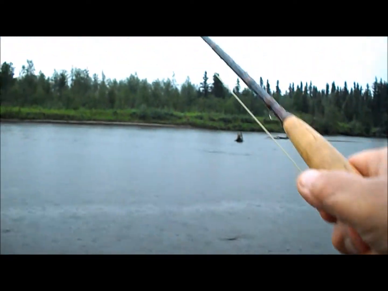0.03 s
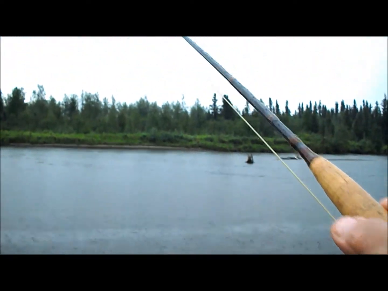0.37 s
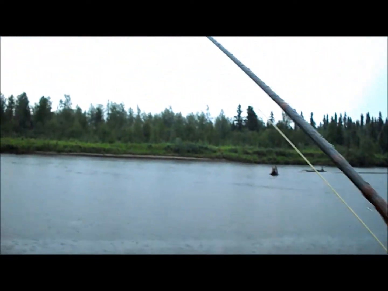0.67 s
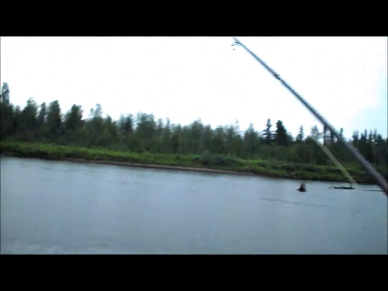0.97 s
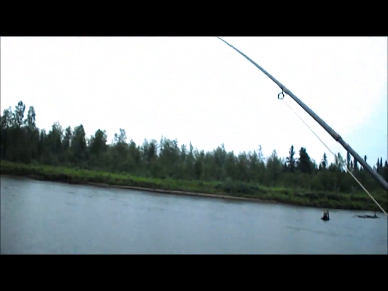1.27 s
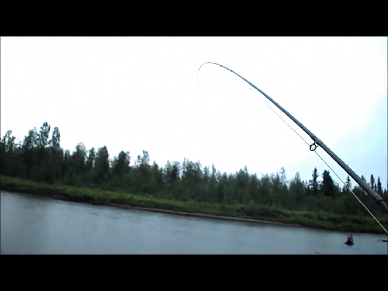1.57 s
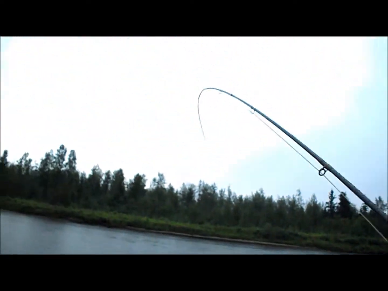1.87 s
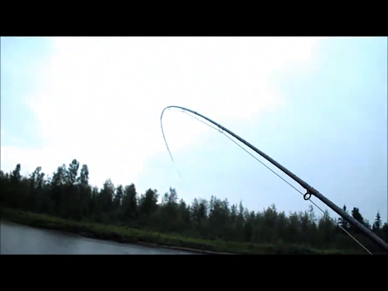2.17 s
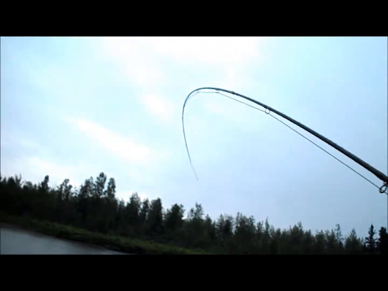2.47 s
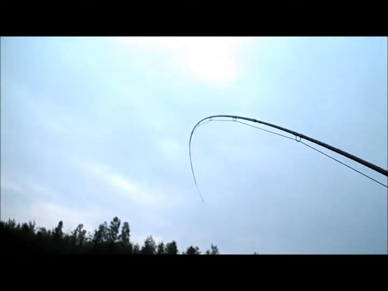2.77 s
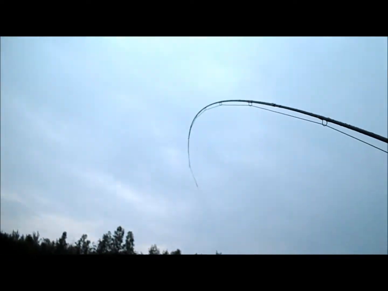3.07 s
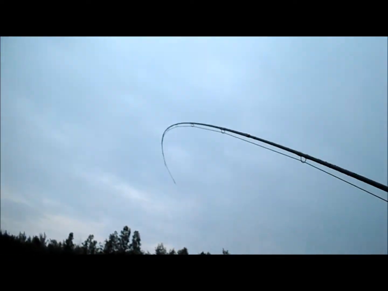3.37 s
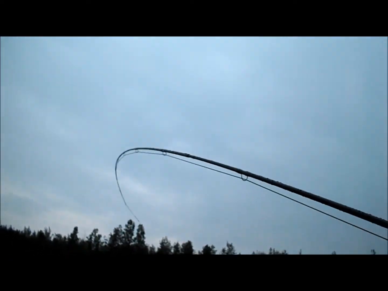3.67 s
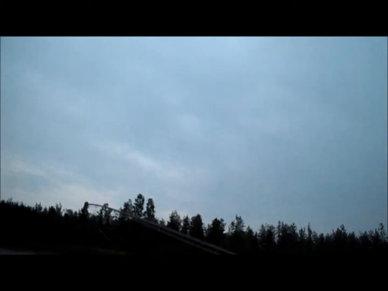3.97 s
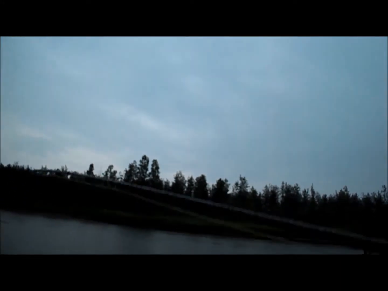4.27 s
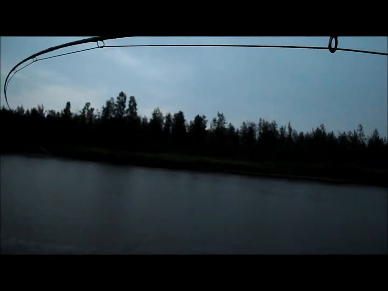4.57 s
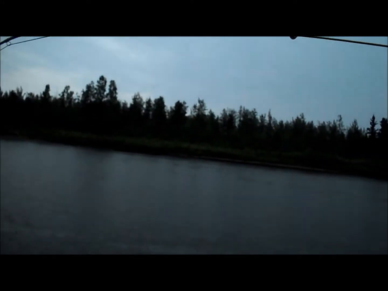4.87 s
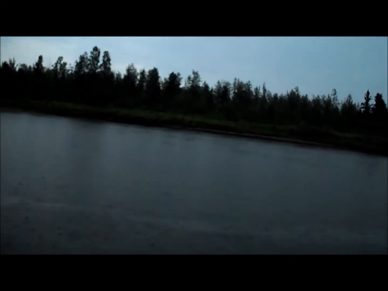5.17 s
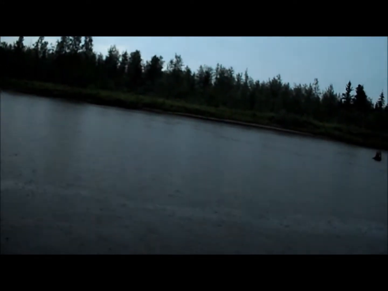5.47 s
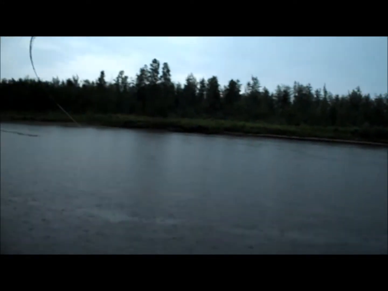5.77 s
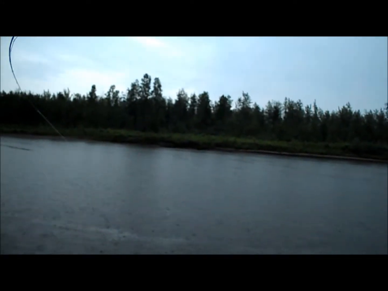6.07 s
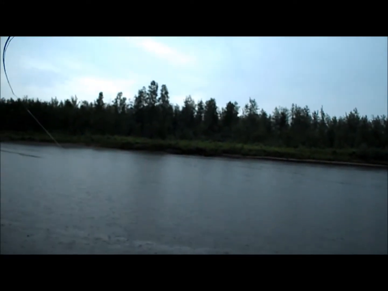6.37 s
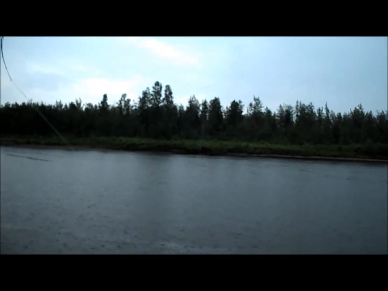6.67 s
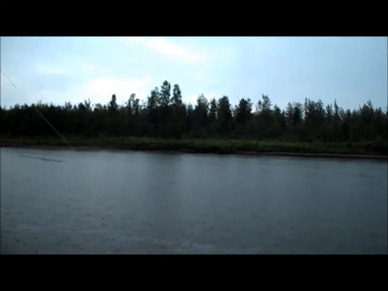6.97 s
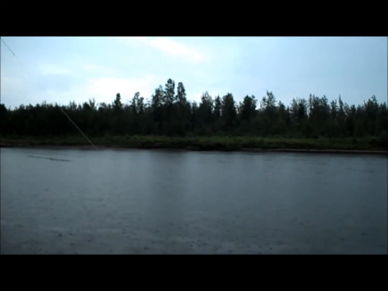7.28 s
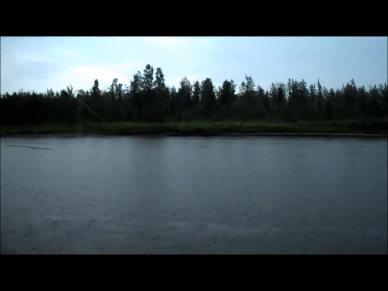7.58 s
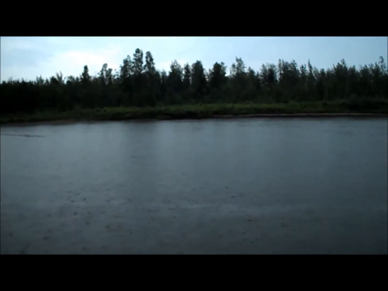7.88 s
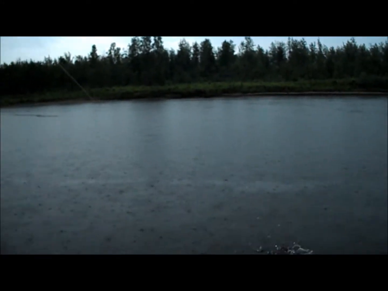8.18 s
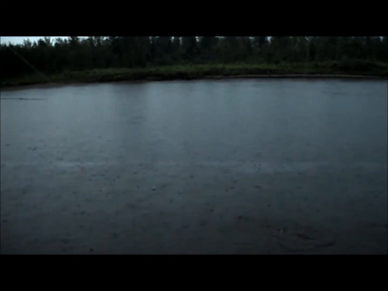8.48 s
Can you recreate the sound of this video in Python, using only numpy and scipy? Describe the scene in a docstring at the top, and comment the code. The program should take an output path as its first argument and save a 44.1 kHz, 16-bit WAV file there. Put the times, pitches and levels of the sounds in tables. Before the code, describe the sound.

Steady rain falls on a wide river for the whole eight and a half seconds, heard from the bank through a small handheld microphone. Distant drops merge into an even hiss, while nearer ones tick on the water and leave tiny, high bubble plinks. Now and then a drop strikes the microphone with a sharp click, clearly at about 2.1 seconds, hardest at 3.3 and again at 7.1. The hand makes a faint low rustle and soft, dull bumps between roughly 2.5 and 4.5 seconds, with firmer bumps at 6.2 and 7.7. A very faint, distant hum lies under the first few seconds. Around 6 seconds the water gives two slight sloshes. From 7.6 seconds to the end, a quick run of small, fizzy splashes stirs the shallows, with one loud, bright plink at 8.2, while the rain continues unchanged.

```python
"""Steady rain hisses on a wide river, heard through a small camera held by an angler on the bank.
Countless far drops merge into the hiss; nearer ones tick and now and then trap a ringing bubble,
and a few strike the camera itself. The hand rustles and softly bumps the case, and a faint drone
hums far away. Near the end something, probably a hooked fish, splashes in the shallows."""
import sys
import numpy as np
from scipy import signal
from scipy.fft import rfft, irfft, next_fast_len
from scipy.io import wavfile
from scipy.ndimage import uniform_filter1d, minimum_filter1d

SR = 44100
rng = np.random.default_rng(int(sys.argv[2]) if len(sys.argv) > 2 else 0)


def store_pcm(level_fs):
    """Save levels as 16-bit WAV."""
    pcm = np.round(np.clip(level_fs, -1, 1) * 32767).astype(np.int16)
    wavfile.write(sys.argv[1], SR, np.atleast_2d(pcm).T)


N = 376613


def undb(db):
    """Turn decibels into a number to multiply by."""
    return 10 ** (np.asarray(db) / 20)


def level(x, db):
    """Set the average (rms) level of a sound."""
    return x * undb(db) / np.sqrt(np.mean(x ** 2))


def band(x, lo_hz, hi_hz, order=2):
    """Keep the part of a sound between two frequencies."""
    return signal.sosfilt(signal.butter(order, [lo_hz, hi_hz], "band", fs=SR, output="sos"), x)


def wander(turns_per_s):
    """A smooth random drift, about 1 in size."""
    hold = int(SR / turns_per_s)
    steps = np.repeat(rng.standard_normal(N // hold + 1), hold)[:N]
    return level(uniform_filter1d(steps, hold), 0)


def place(start_s, sounds):
    """Add up short sounds (one a row), each at its own start time."""
    at = (start_s * SR).astype(int)[:, None] + np.arange(sounds.shape[1])
    return np.bincount(at.ravel(), sounds.ravel(), N)[:N]


def impacts(pitch_hz, width_hz, samples):
    """Quick blows that swell and die, one a row; a wider spread of frequencies makes a shorter blow."""
    t = np.arange(samples) / SR
    age = np.pi * width_hz[:, None] * t
    flow = age * np.exp(1 - age) * np.sin(2 * np.pi * pitch_hz[:, None] * t)
    pressure = np.diff(flow, axis=1, prepend=0)  # the sound follows the change of flow
    return pressure / np.abs(pressure).max(axis=1, keepdims=True)


def bubbles(pitch_hz, cycles, rise, samples):
    """Ringing air bubbles, one a row, whose pitch climbs as they near the surface."""
    t = np.arange(samples) / SR
    ring_s = cycles / pitch_hz  # time to fade by 60 dB: large, low bubbles ring longer
    age = t / ring_s[:, None]
    turns = pitch_hz[:, None] * t * (1 + rise * age / 2)
    swell = np.minimum(turns, 1)  # the bubble pinches off within one cycle
    return swell * np.exp(-np.log(1000) * age) * np.sin(2 * np.pi * turns)


def shower(count, centre_hz, octaves, spread_db, breadth, start_s=0):
    """Drops tick at random moments from start_s on; many are small, few are large."""
    when, size, pitch, shape = rng.random((count, 4)).T
    hz = np.clip(centre_hz * 2 ** (octaves * np.log(pitch / (1 - pitch)) / 2), 1100, 9500)
    gain = undb(-spread_db * np.log(size + .02))
    gain *= np.sqrt(hz / centre_hz)  # a slow blow carries no more energy than a quick one
    ticks = impacts(hz, breadth * hz * (shape + .5), samples=160)
    return place(start_s + (N / SR - start_s) * when, gain[:, None] * ticks)


def plinks(count, centre_hz, octaves, spread_db, cycles, start_s=0):
    """Small bubbles ring briefly at random moments from start_s on."""
    when, size, up, down = rng.random((count, 4)).T
    hz = centre_hz * 2 ** (octaves * (up - down))
    gain = undb(-spread_db * np.log(size + .02)) * np.sqrt(hz / centre_hz)
    rings = bubbles(hz, cycles, rise=0.2, samples=640)
    return place(start_s + (N / SR - start_s) * when, gain[:, None] * rings)


# The two tones of the drone: upper_hz, lower_hz
DRONE_PITCHES = [339, 269]
# How loud each tone is as time passes: time_s, upper_db, lower_db
DRONE_LEVELS = [(0, -69, -76.5), (1.4, -70, -77), (2.4, -72, -79), (3.0, -83, -79), (5.3, -98, -87),
                (6, -92, -74), (8.54, -92, -74.5)]
def far_drone(waver=0.00466, flutter_db=1.0):
    """Two faint wavering tones, perhaps a motor far down the river."""
    time_s, *tone_levels = np.transpose(DRONE_LEVELS)
    hum = np.zeros(N)
    for pitch_hz, level_db in zip(DRONE_PITCHES, tone_levels):
        turns = np.cumsum(pitch_hz * (1 + waver * wander(9))) / SR
        tone = np.sin(2 * np.pi * turns) * undb(flutter_db * wander(12))
        hum += level(tone, np.interp(np.arange(N) / SR, time_s, level_db))
    return hum


# Shifts of the grip: middle_s, level_db, half_length_s
GRIP_SHIFTS = [(2.65, -71, 0.33), (3.42, -69, .06), (3.818, -64, 0.12), (4.47, -68.5, .2), (5.4, -76.5, .8)]
# Dull bumps, probably of the hand on the case: start_s, peak_db, pitch_hz
HAND_BUMPS = [(3.312, -37, 340), (3.428, -44.5, 280), (3.776, -47, 258), (3.855, -42.5, 240),
              (3.886, -44.5, 220), (4.338, -49.5, 167), (6.157, -27.5, 470), (7.741, -31, 360)]
def hand_on_camera(rest_db=-85, flutter_db=3.8):
    """The grip makes a low rustle that swells whenever it shifts, and the fingers bump the case."""
    t = np.arange(N) / SR
    shifts = sum(undb(db) * np.exp(-((t - s) / half_s) ** 2) for s, db, half_s in GRIP_SHIFTS)
    rustle = band(rng.standard_normal(N), 71, 246) * undb(flutter_db * wander(22))
    grip = level(rustle, 0) * (undb(rest_db) + shifts)
    start_s, peak_db, pitch_hz = np.transpose(HAND_BUMPS)
    width_hz = 2400 * (pitch_hz / 1000) ** 1.73  # a harder bump is higher and much shorter
    bumps = undb(peak_db)[:, None] * impacts(pitch_hz, width_hz, samples=2048)
    return grip + place(start_s, bumps)


# The tone of the far rain, from bass to treble: frequency_hz, relative_db
HISS_TONE = [(50, -31), (120, -21.5), (200, -15), (300, -10), (495, -7), (735, -2), (1070, -1), (1500, -2),
             (2000, -2), (3300, -2.5), (5000, -3), (7100, -8.5), (9770, -8), (10900, -15.5), (13000, -39)]
def far_rain(hiss_db=-1, flicker_db=1.0):
    """Drops all over the river merge into a hiss; each octave flickers slightly on its own."""
    samples = next_fast_len(N, real=True)
    hz = np.arange(samples // 2 + 1) * SR / samples + 1
    frequency_hz, relative_db = np.transpose(HISS_TONE)
    tone_db = np.interp(np.log(hz), np.log(frequency_hz), relative_db)
    spectrum = rfft(rng.standard_normal(samples)) * undb(tone_db)
    octave = np.clip(np.log2(hz / 400), 0, 4).astype(int)
    parts = [irfft(spectrum * (octave == k), samples)[:N] for k in range(5)]
    return level(sum(part * undb(flicker_db * wander(14)) for part in parts), hiss_db)


def patter(tick_db=-8.0, plink_db=-7.5, near_db=-12.5):
    """Drops a few metres away tick on the water; some leave a bubble, and a few land nearer."""
    ticks = shower(count=2600, centre_hz=3240, octaves=0.78, spread_db=6.5, breadth=0.42)
    rings = plinks(count=1100, centre_hz=3705, octaves=1.074, spread_db=4.0, cycles=45)
    near = shower(count=70, centre_hz=3000, octaves=0.64, spread_db=3.0, breadth=0.63)
    return level(ticks, tick_db) + level(rings, plink_db) + level(near, near_db)


# The loudest drops close by: start_s, level_db, pitch_hz
CLOSE_DROPS = [(0.3997, -36.5, 3300), (0.525, -35.5, 3430), (0.8254, -38, 3190), (1.2509, -35.5, 3000),
               (1.2834, -34.5, 1340), (1.3856, -33, 1380), (1.444, -37, 910), (1.462, -39, 2000),
               (1.637, -36, 3230), (2.6353, -36, 1300), (2.7084, -35.5, 3710), (3.6295, -35.5, 3500),
               (3.7063, -31, 980), (3.7736, -38, 3230), (4.2305, -40, 2900), (4.367, -40, 1900),
               (4.4787, -38.5, 2880), (4.8537, -38, 1990), (5.2379, -38, 4090), (5.6347, -36, 1430),
               (5.7146, -33, 4470), (6.0128, -32.5, 2930), (6.1285, -39, 1700), (6.2002, -38, 3520),
               (6.244, -35, 2900), (6.9275, -37, 990), (7.3135, -40, 1000), (7.319, -35, 1290),
               (7.5514, -37, 1530), (7.715, -26, 3380), (7.811, -34, 2300), (8.1978, -34.5, 4080),
               (8.504, -35, 2520)]
def close_drops():
    """Single drops hit the water within reach, each with one sharp tick."""
    start_s, level_db, pitch_hz = np.transpose(CLOSE_DROPS)
    width_hz = 1120 * (pitch_hz / 1000) ** 0.44  # higher ticks are shorter
    ticks = impacts(pitch_hz, width_hz, samples=220)
    gain = undb(level_db) / ticks.std(axis=1)
    return place(start_s, gain[:, None] * ticks)


# The largest trapped air bubbles: start_s, level_db, pitch_hz
BIG_BUBBLES = [(0.368, -27.5, 1900), (0.908, -28.5, 2980), (2.052, -31, 1410), (2.3073, -31.5, 1210),
               (3.327, -28.5, 2530), (4.1, -29, 4300), (4.734, -28, 2780), (4.802, -26, 4700),
               (5.29, -27, 2640), (5.529, -26, 3560), (6.033, -27.5, 2310), (7.069, -35, 2350),
               (7.078, -29, 4440), (7.775, -34, 1150), (7.816, -23.5, 5000), (8.1896, -14, 5300),
               (8.362, -28, 2030), (8.422, -29.5, 1170)]
def big_bubbles(tick_db=-5):
    """Air trapped by a drop rings like a tiny bell, set off by a small tick."""
    start_s, level_db, pitch_hz = np.transpose(BIG_BUBBLES)
    rings = bubbles(pitch_hz, cycles=41, rise=0.25, samples=4096)
    ticks = undb(tick_db) * impacts(pitch_hz, width_hz=0.69 * pitch_hz, samples=4096)
    return place(start_s, undb(level_db)[:, None] * (rings + ticks))


# The notes the camera case rings with: pitch_hz, relative_db, ring_s (time to fade by 60 dB)
CASE_NOTES = [(1020, -16.5, 0.042), (1280, -2, 0.0086), (1772, -18.5, 0.054), (1865, 1.5, 0.0097),
              (2900, -10.5, 0.013), (3370, -2.5, 0.004), (4180, 0.5, 0.0068), (5000, 4, 0.0033),
              (6000, -4, 0.0017), (8500, -5, 0.0021), (9520, -3, 0.0038)]
# The borders of the five frequency bands of a tap, low to high: edge_hz
TAP_BAND_EDGES = [450, 1400, 2700, 4700, 7500, 10800]
# Drops on the camera, with a level for each band: start_s, body_db, knock_db, crack_db, snap_db, spit_db
CAMERA_TAPS = [(0.5018, -36.5, -43, -36, -40, -40), (0.9907, -49, -42, -39, -39, -30),
               (1.1261, -44, -40, -39, -35, -29.5), (2.1032, -43, -32, -22.5, -24, -49),
               (2.388, -45, -41, -58, -34.5, -41.5), (2.568, -45, -50, -38.5, -43, -30),
               (3.2767, -20.5, -15.5, -19.5, -12.5, -17.5), (3.3134, -45, -34, -37, -40, -44),
               (4.6167, -49, -43, -41.5, -39, -52), (4.675, -46, -43, -37, -51, -33),
               (6.1206, -40.5, -31, -41, -32, -33), (7.059, -40, -26.5, -25, -28, -28.5),
               (7.4038, -30.5, -48, -36, -54, -44)]
def camera_taps(burst_s=0.00084):
    """A drop bursts on the case and makes it ring; where it lands makes it duller or brighter."""
    t = np.arange(2048) / SR
    ring = sum(undb(db) * np.exp(-np.log(1000) * t / ring_s) * np.cos(2 * np.pi * hz * t)
               for hz, db, ring_s in CASE_NOTES)
    attack = SR // 200  # the band levels apply to the first 5 ms
    taps = np.zeros((len(CAMERA_TAPS), len(t)))
    for tap, (_, *band_levels) in zip(taps, CAMERA_TAPS):
        blow = ring + rng.standard_normal(len(t)) * np.exp(-t / burst_s)
        for k, db in enumerate(band_levels):
            part = band(blow, TAP_BAND_EDGES[k], TAP_BAND_EDGES[k + 1])
            sign = (-1) ** k  # flip every other band so that they join without a hole
            tap += sign * part * undb(db) / part[:attack].std()
    return place(np.array(CAMERA_TAPS)[:, 0], taps)


# Sloshes of stirred water in the shallows: peak_s, strength_db, fall_s
SLOSHES = [(6.025, -44.5, .025), (6.168, -41, .015), (7.652, -41, 0.037), (7.705, -37, 0.033),
           (7.757, -34, 0.016), (7.812, -41, 0.03), (7.875, -35, 0.023), (7.928, -39.5, 0.07),
           (8.087, -34, 0.014), (8.195, -38, 0.026), (8.36, -43.5, 0.037), (8.419, -37.5, 0.028),
           (8.5, -46, .04)]
def splash(rise_s=.009, spray_db=-3, fizz_db=-2.0, foam_db=-4):
    """Each slosh rises fast and dies away; water falls back as droplets and bubbles over hissing foam."""
    t = np.arange(N) / SR
    sloshes = [undb(db) * np.exp(-np.maximum((peak_s - t) / rise_s, (t - peak_s) / fall_s))
               for peak_s, db, fall_s in SLOSHES]
    stir = np.sqrt(sum(slosh ** 2 for slosh in sloshes))
    start_s = SLOSHES[0][0] - 2 * rise_s
    spray = shower(count=3600, centre_hz=4300, octaves=0.76, spread_db=4.5, breadth=0.16, start_s=start_s)
    fizz = plinks(count=1200, centre_hz=3900, octaves=1.28, spread_db=5.5, cycles=26, start_s=start_s)
    foam = band(rng.standard_normal(N), 2800, 5600, order=1)
    layers = [(spray, spray_db), (fizz, fizz_db), (foam, foam_db)]
    return stir * sum(x * undb(db) / x[int(start_s * SR):].std() for x, db in layers)


def scene(rain_db=-44, gust_db=.15, gusts_per_s=1.33):
    """The patter and the far hiss swell very slightly together; the other sounds are laid on top."""
    rain = (patter() + far_rain()) * undb(rain_db + gust_db * wander(gusts_per_s))
    close = close_drops() + big_bubbles() + camera_taps() + splash() + hand_on_camera()
    return (rain + close + far_drone())[None]


def record(dry, ceiling=1.0, bass_cut_hz=70, treble_cut_hz=10700):
    """The camera cuts the deep bass, briefly turns down any peak that is too loud, and cuts the top."""
    thin = signal.sosfilt(signal.butter(2, bass_cut_hz, "high", fs=SR, output="sos"), dry)
    allowed = ceiling / np.maximum(np.abs(thin), ceiling)
    gain = uniform_filter1d(minimum_filter1d(allowed, size=21), size=21)
    return signal.sosfilt(signal.ellip(8, .2, 70, treble_cut_hz, fs=SR, output="sos"), thin * gain)


dry = scene()
out = record(dry)
store_pcm(out)
```